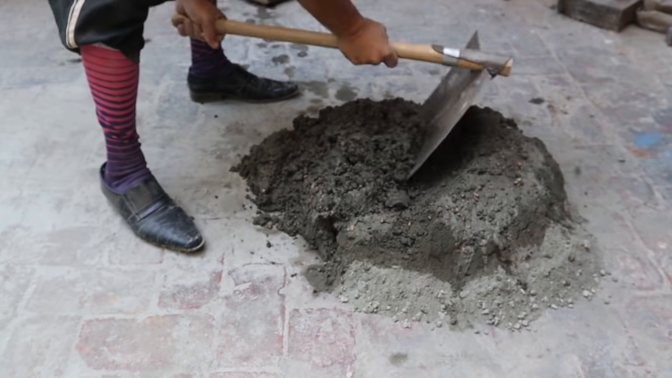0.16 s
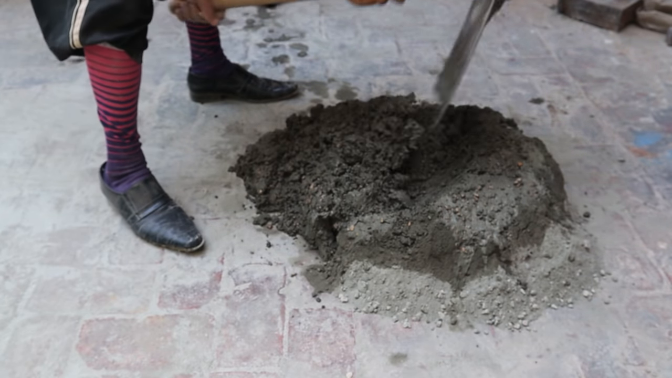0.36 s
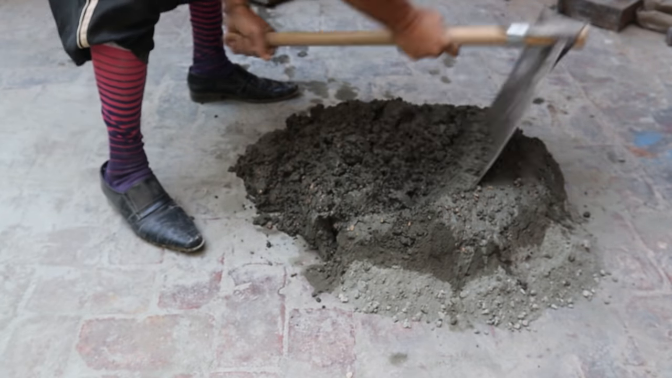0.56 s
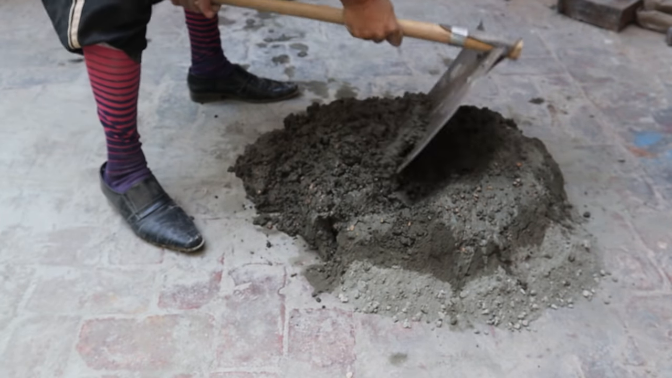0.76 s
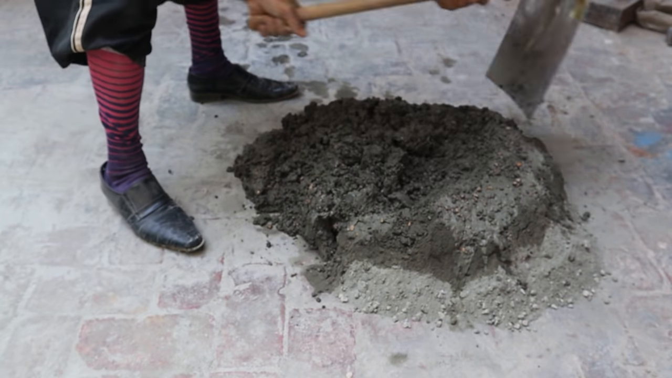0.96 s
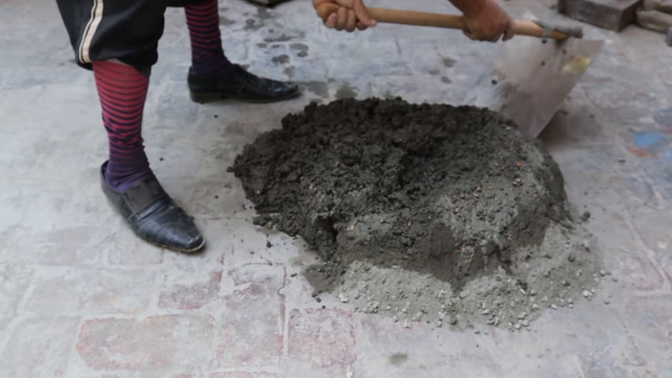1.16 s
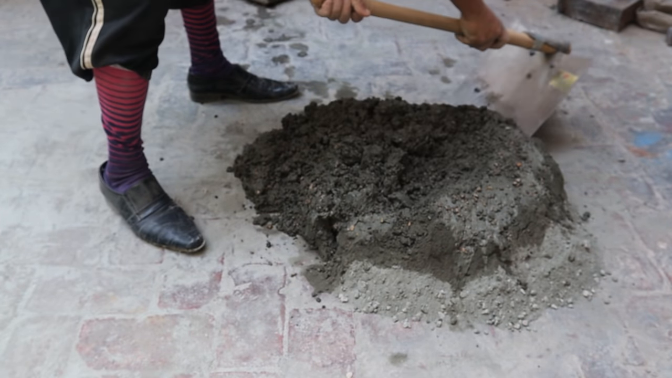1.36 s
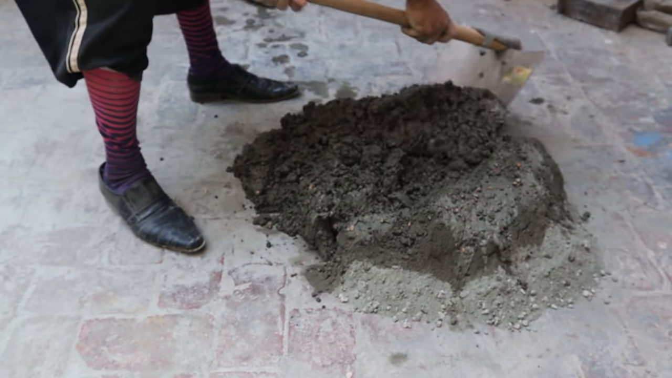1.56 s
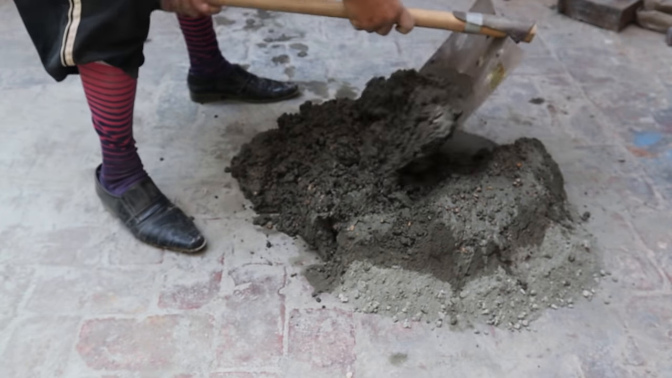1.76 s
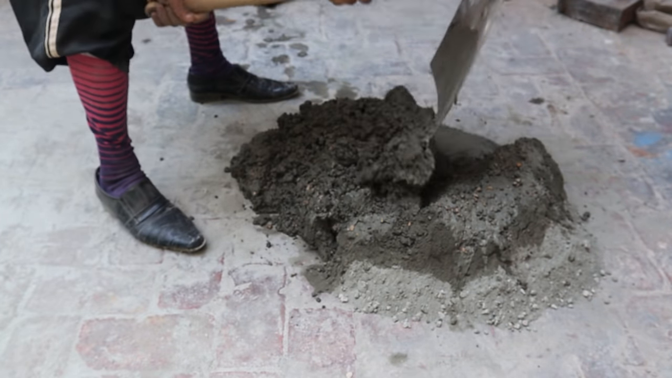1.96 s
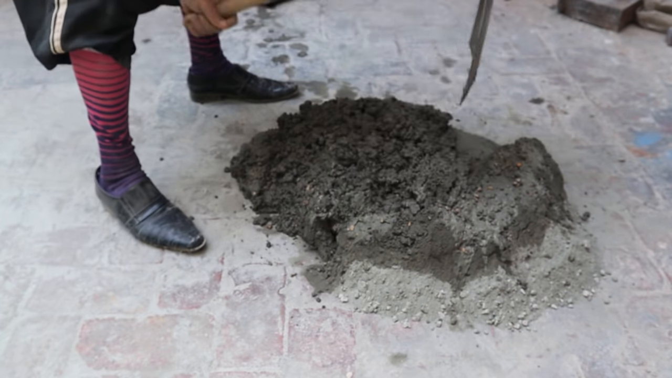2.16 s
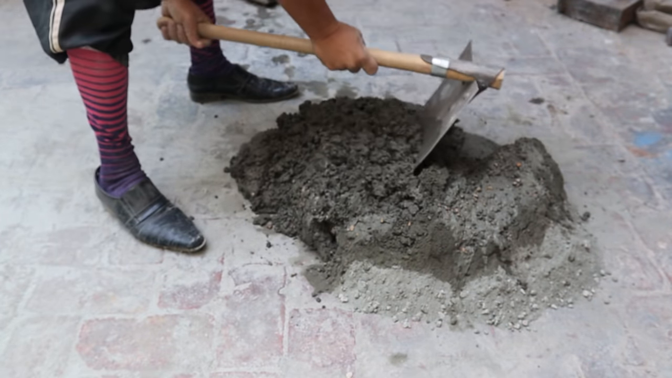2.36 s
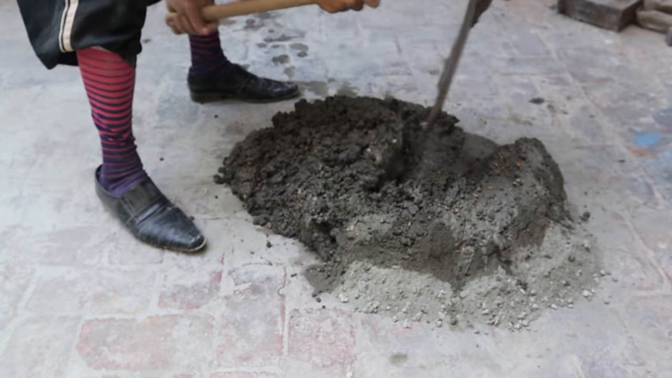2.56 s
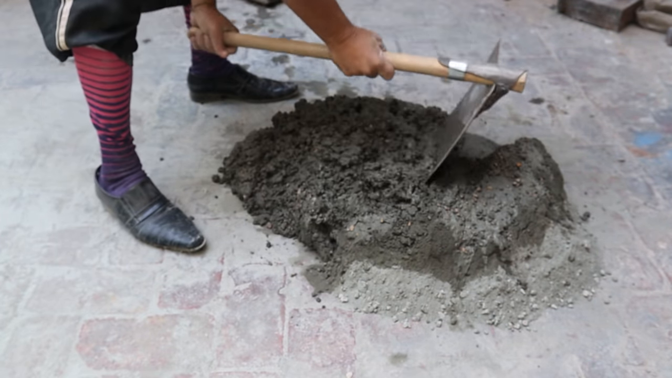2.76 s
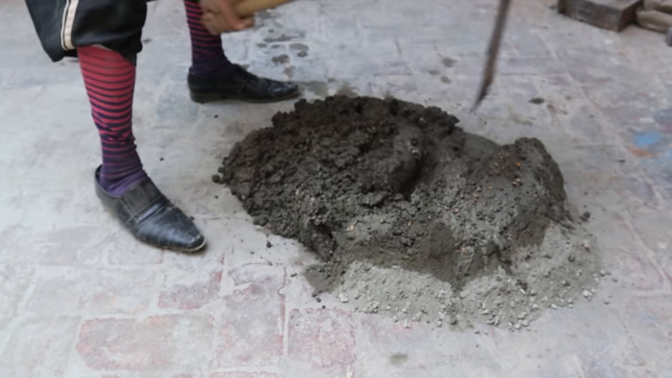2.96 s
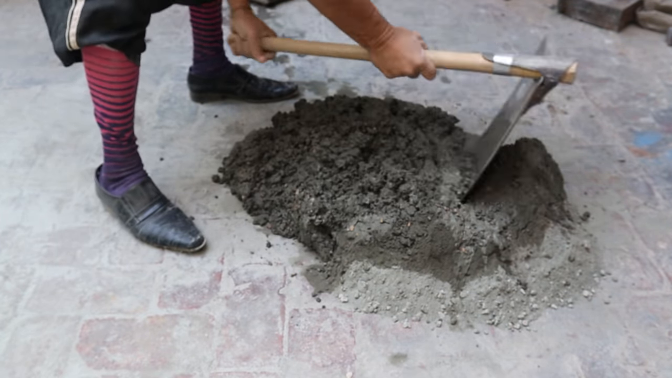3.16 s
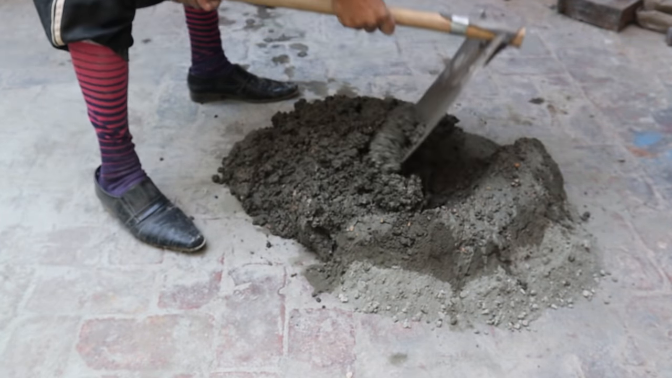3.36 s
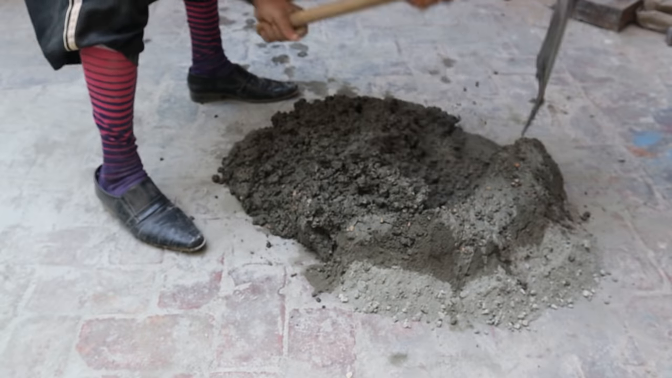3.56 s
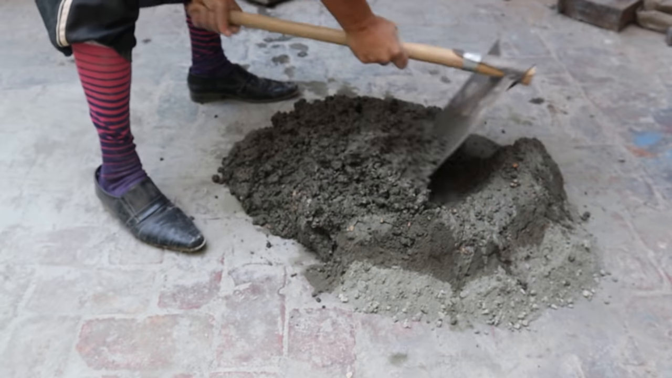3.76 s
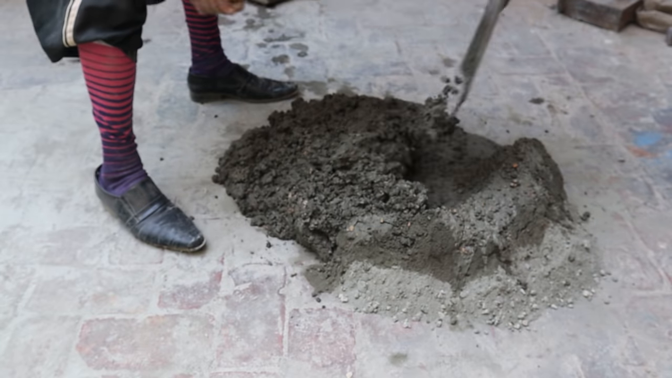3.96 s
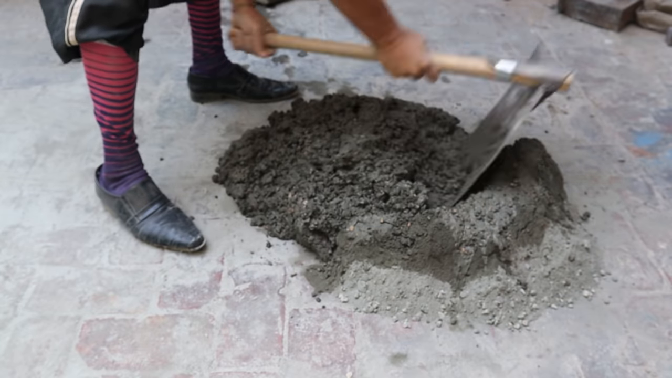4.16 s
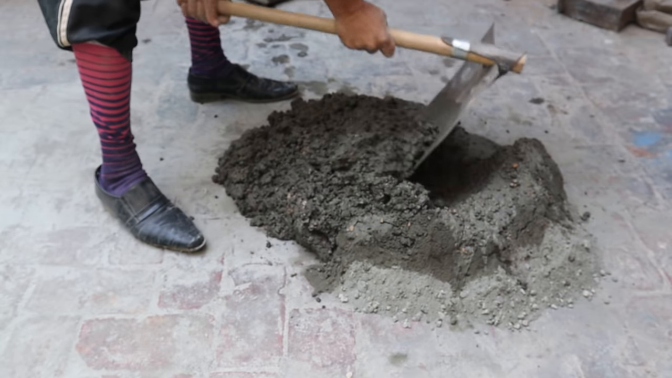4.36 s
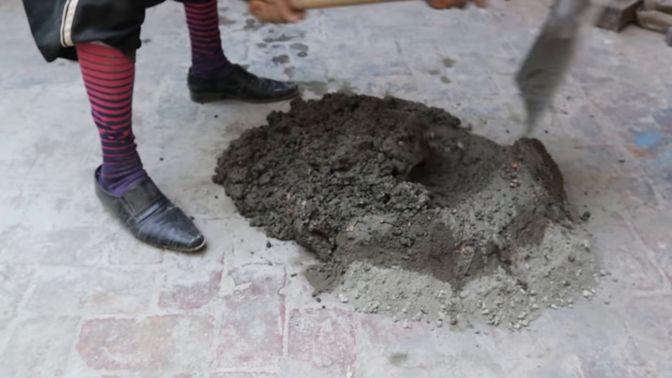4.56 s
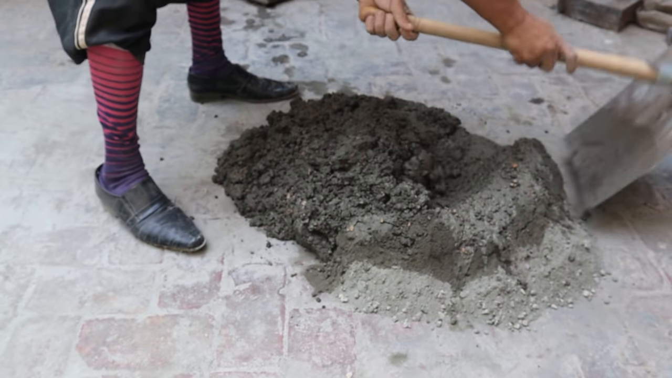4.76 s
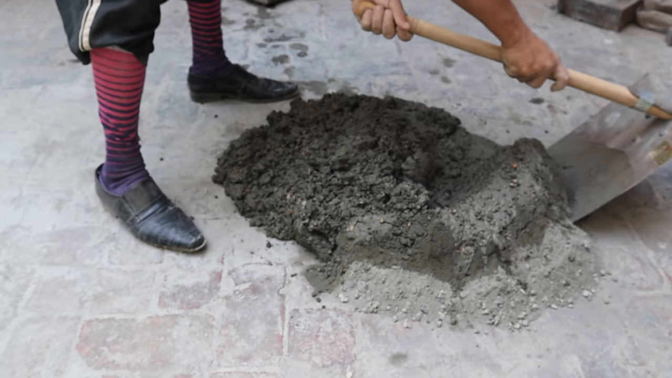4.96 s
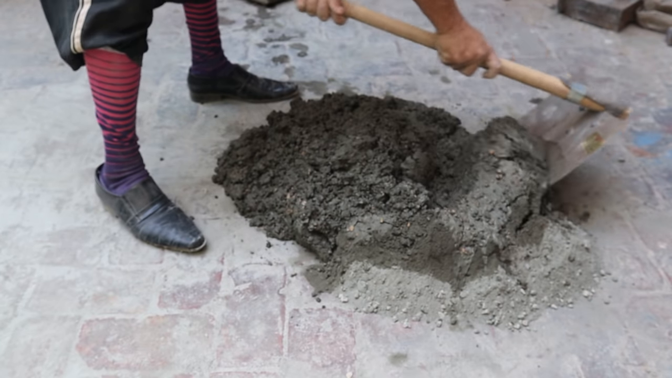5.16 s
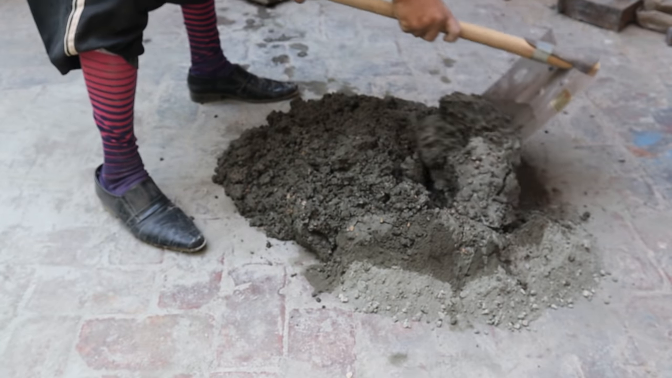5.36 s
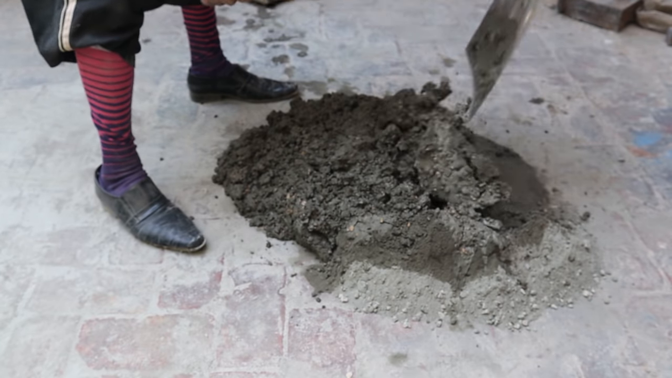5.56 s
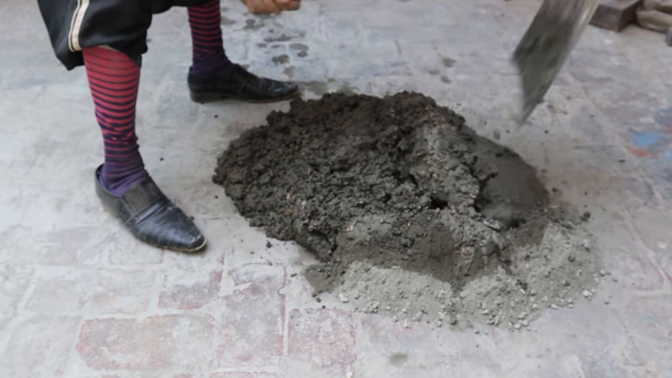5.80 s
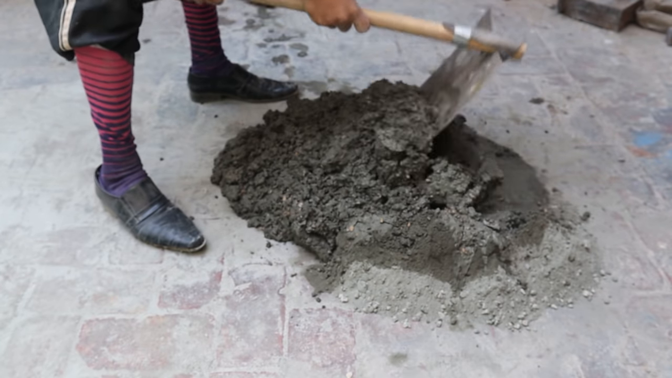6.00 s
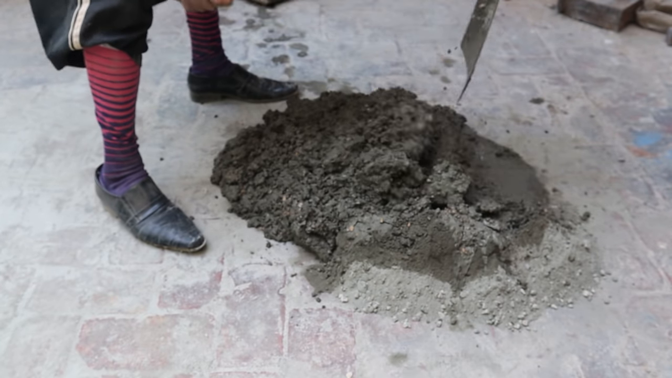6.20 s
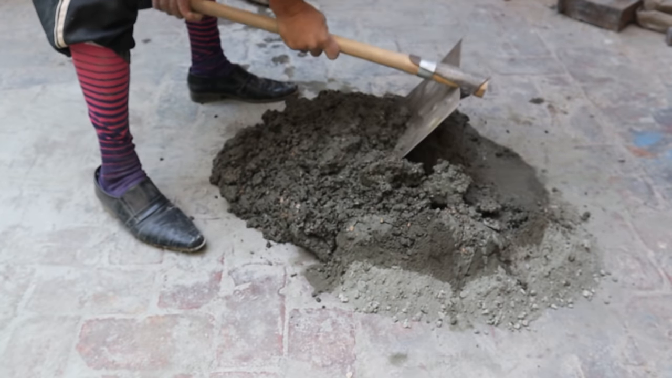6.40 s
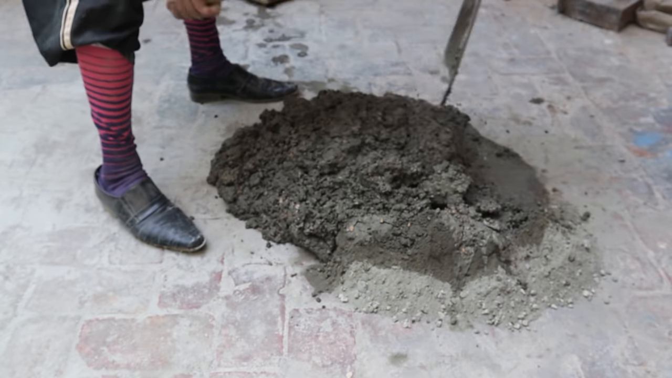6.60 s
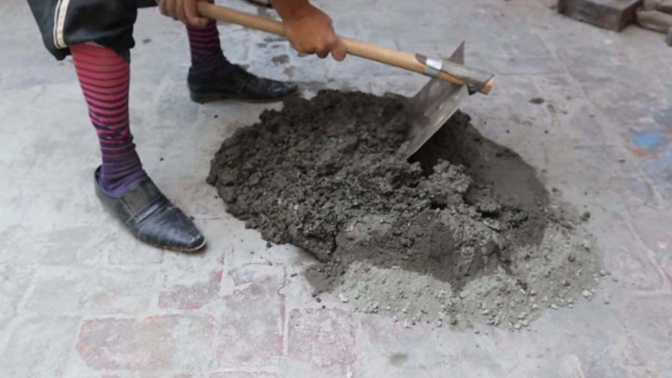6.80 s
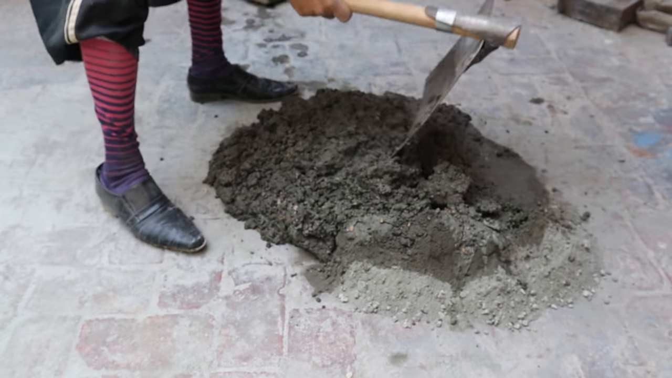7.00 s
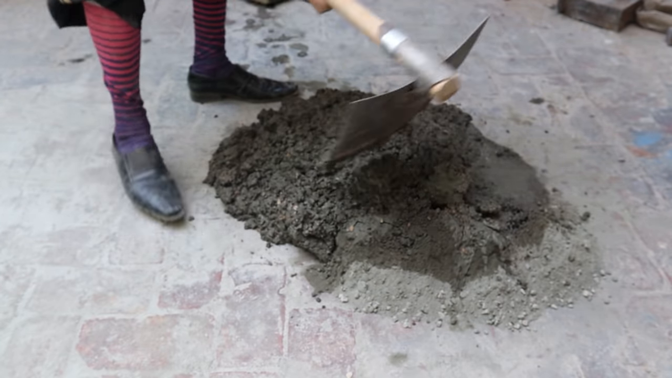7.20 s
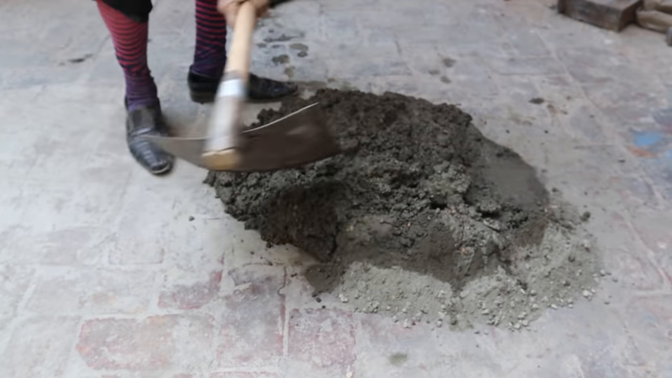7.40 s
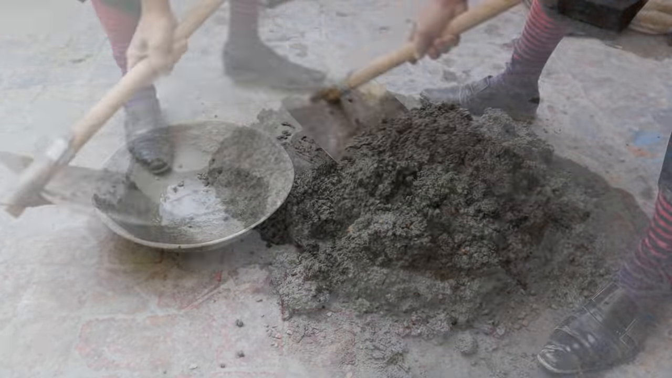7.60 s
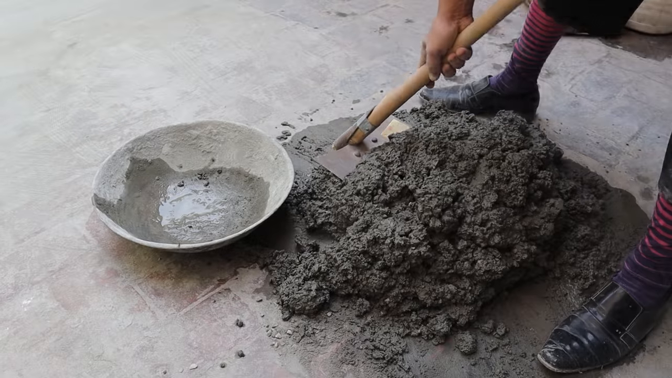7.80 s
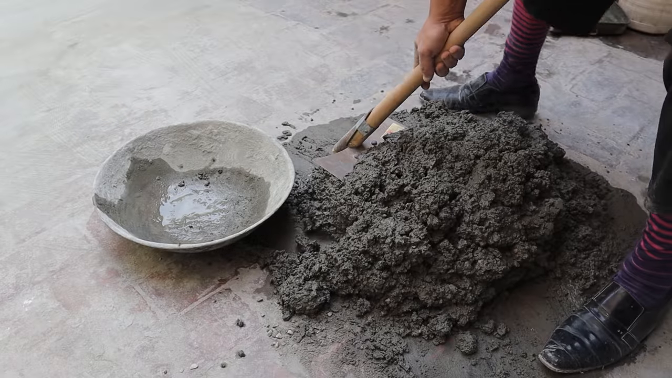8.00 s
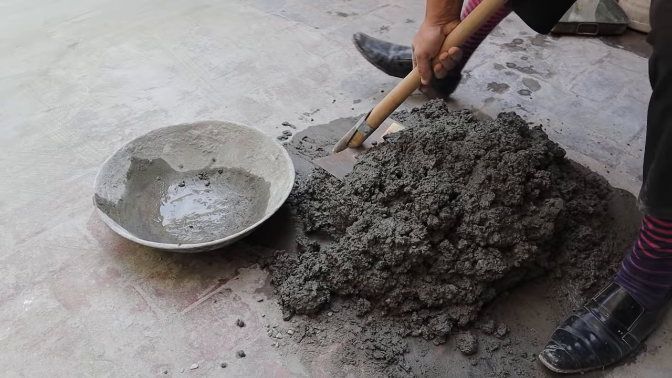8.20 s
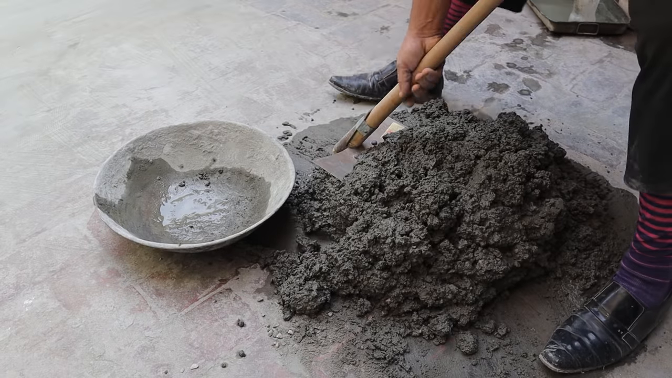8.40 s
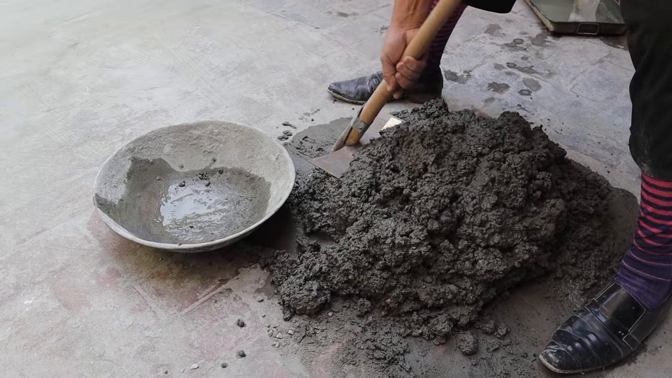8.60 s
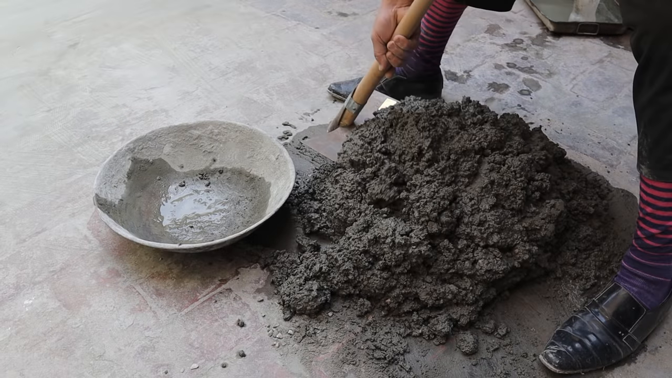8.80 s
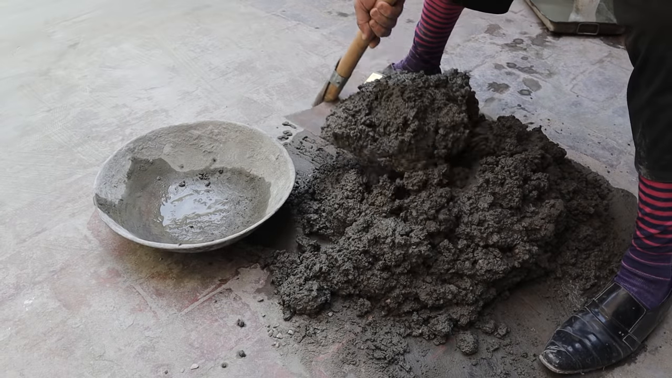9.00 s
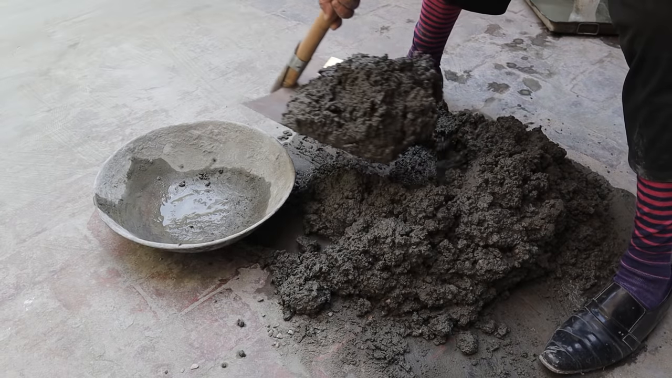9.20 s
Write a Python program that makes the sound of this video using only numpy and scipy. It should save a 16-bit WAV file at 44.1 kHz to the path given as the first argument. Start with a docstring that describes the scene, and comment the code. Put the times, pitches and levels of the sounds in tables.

```python
"""A steel blade chops into a heap of damp sand and cement on a hard yard floor, drags through it and tips it over.
Grit crunches as coloured random grains, and the blade rings dully as a set of steel modes driven by knocks.
Crumbs and dull knocks are short noise bursts; far traffic hums as ringing noise and hoots as wavering tones.
The left microphone port is open, the right one is muffled."""
import sys
import numpy as np
from scipy import signal
from scipy.fft import rfft, irfft, next_fast_len
from scipy.io import wavfile
from scipy.ndimage import uniform_filter1d

SR = 44100
rng = np.random.default_rng(int(sys.argv[2]) if len(sys.argv) > 2 else 0)


def wav_record(signal):
    """Record a signal, one row per channel, as 16-bit PCM in the file named by sys.argv[1]."""
    frames = np.transpose(np.atleast_2d(signal))
    bounded = np.clip(frames, -1, 1)
    # unit amplitude maps onto the largest positive 16-bit level
    quanta = np.round(bounded * 32767).astype(np.int16)
    wavfile.write(sys.argv[1], SR, quanta)


def natural_amplitude(level_db):
    """Convert a level in decibels to a linear amplitude factor, elementwise."""
    exponent = np.asarray(level_db, float) / 20
    return 10 ** exponent


N = 407925

# The tone colour of sand grinding on steel. Each row: pitch in Hz, relative level in dB.
GRIT_COLOUR = [(1200, -17), (2200, 0.5), (4000, 1), (6200, -1), (7200, 2), (10500, -1.5), (13000, -8),
               (15600, -12.5), (16400, -46)]


def evened(x):
    """Scales a signal to an average strength (rms) of 1."""
    return x / np.sqrt(np.mean(x ** 2) + 1e-20)


def add(mix, start_s, sound):
    """Mixes a sound in at the given time, cutting off what runs past the end."""
    part = mix[round(start_s * SR):][:len(sound)]
    part += sound[:len(part)]


def read(points, hz):
    """Reads a table of levels by pitch, on a log-frequency axis."""
    f, value = np.transpose(points)
    return np.interp(np.log(hz + 1), np.log(f + 1), value)


def colour(x, points):
    """Causal filter with the given spectrum; its phase is the Hilbert transform of the log gain."""
    level_db = read(points, abs(np.fft.fftfreq(4096, 1 / SR)))
    log_gain = np.log(natural_amplitude(np.maximum(level_db, -100)))
    taps = np.fft.ifft(np.exp(np.conj(signal.hilbert(log_gain)))).real[:2048]
    return signal.oaconvolve(x, taps / np.linalg.norm(taps))[:len(x)]


def band(x, lo_hz, hi_hz):
    """Keeps mainly the pitches between two limits."""
    sos = signal.butter(2, [lo_hz, min(hi_hz, .45 * SR)], "band", fs=SR, output="sos")
    return signal.sosfilt(sos, x)


def ring(x, modes, damping):
    """Makes a set of modes ring; more damping widens each mode, so it dies sooner."""
    t = np.arange(SR // 2) / SR
    taps = np.zeros(len(t))
    for k, (hz, width, db) in enumerate(modes):
        decay = np.exp(-np.pi * width * damping * t)
        sign = (-1) ** k  # neighbouring modes start in opposite directions
        taps += sign * natural_amplitude(db) * width * decay * np.sin(2 * np.pi * hz * t)
    return signal.oaconvolve(x, taps / np.linalg.norm(taps))[:len(x)]


def distance():
    """Outdoor air is coloured noise, traffic hum is noise through low modes, hoots are thin wavering tones."""
    # The tone colour of the air. Each row: pitch in Hz, relative level in dB.
    air_colour = [(18, -45.5), (30, -16), (53, -24), (131, 0.5), (913, 6), (1160, 5.5), (6900, -4),
                  (13300, -17.5), (16000, -14.5)]
    # How the air swells and stills. Each row: time in seconds, change of level in dB.
    air_swell = [(0, 0.5), (.55, -4), (1.1, -4), (2.5, -0.5), (4.5, 2), (5.8, -5), (7.3, -8), (8.2, -2.5),
                 (9.25, -1.5)]
    # The modes of the low hum. Each row: pitch in Hz, width in Hz before damping, relative level in dB.
    hum_modes = [(143, 9.4, 1), (185, 13, -13.5), (232, 14, 2.5), (300, 98, -1.5), (312.5, 120, 3),
                 (530, 160, -5.5)]
    # How the traffic hum comes and goes. Each row: time in seconds, relative level in dB.
    hum_swell = [(0, -68), (3.2, -73), (3.68, -56), (4.2, -63), (5.6, -71.5), (7.3, -68), (7.9, -52),
                 (8.4, -56), (8.53, -51.5), (8.95, -63.5), (9.03, -53.5), (9.25, -56.5)]
    # The far hoots. Each row: start in seconds, end in seconds, pitch in Hz, relative level in dB.
    hoot_rows = [(.3, 0.67, 1190, -62.5), (1.05, 1.242, 1660, -68.5), (1.1, 1.24, 774, -69),
                 (2.02, 2.36, 1196, -61), (2.6, 3.114, 1187, -63), (7.9, 8.31, 1700, -66),
                 (8.65, 9.202, 1580, -66)]

    t = np.arange(N) / SR
    air = natural_amplitude(-58.5) * colour(rng.standard_normal(N), air_colour)
    air *= natural_amplitude(np.interp(t, *np.transpose(air_swell)))
    hum = evened(ring(rng.standard_normal(N), hum_modes, damping=0.74))
    out = air + hum * natural_amplitude(np.interp(t, *np.transpose(hum_swell)))
    waver = 1 + .15 * evened(uniform_filter1d(rng.standard_normal(N), 1500))  # slow, small level changes
    for start, end, hz, db in hoot_rows:
        span = t[:round((end - start) * SR)]
        tone = np.sin(2 * np.pi * hz * span) * signal.windows.tukey(len(span), .4)
        add(out, start, natural_amplitude(db) * tone * waver[round(start * SR):][:len(span)])
    return out


def ticks(rows, t60, low, high):
    """Each row becomes a noise burst between low and high times its centre, falling 60 dB in t60 seconds."""
    out, t = np.zeros(N), np.arange(SR // 8) / SR
    for s, db, hz in rows:
        burst = evened(band(rng.standard_normal(len(t)), low * hz, high * hz))
        rise = np.minimum(t / 0.00057, 1)
        add(out, s, burst * natural_amplitude(db - 60 * t / t60) * rise)
    return out


def crumbs():
    """Crumbs tick crisply, dull knocks sound lower, and faint crumbs patter at random while the heap is turned."""
    # Single crumbs and pebbles. Each row: start in seconds, relative level in dB, centre pitch in Hz.
    crumb_rows = [(0.0253, -42, 2480), (0.5332, -48, 1720), (0.9901, -45, 4730), (1.0172, -38.5, 2820),
                  (2.2292, -44, 3930), (3.1842, -46, 7160), (3.6586, -45, 5160), (3.6845, -59, 6900),
                  (4.123, -36.5, 1790), (4.1776, -41.5, 5290), (4.7239, -37, 3160), (5.639, -36.5, 7860),
                  (5.8411, -48, 8350), (8.2267, -59.5, 2280), (8.262, -48.5, 1480), (8.303, -40, 890),
                  (8.5428, -53, 2340), (8.834, -43, 4000), (9.0, -45, 2220), (9.19, -46.5, 3785),
                  (7.967, -37.5, 930), (5.605, -46, 6000), (5.241, -21, 1060), (.484, -48, 5870),
                  (.568, -51, 8000)]
    # Dull knocks: clods that drop or break, and at 1.22 to 1.29 s the blade's low ring on the floor.
    # Each row: start in seconds, relative level in dB, centre pitch in Hz.
    knock_rows = [(0.838, -40, 1380), (1.443, -20, 650), (1.224, -22, 280), (1.285, -25, 290),
                  (5.216, -35, 178), (5.241, -29, 234), (7.521, -22.5, 700), (7.554, -21.5, 890),
                  (7.593, -25.5, 1250), (7.608, -22.5, 396), (7.624, -23, 347), (7.9, -39, 283),
                  (7.535, -26.5, 735), (8.505, -39, 250), (8.534, -40, 249), (8.617, -34, 1300),
                  (8.627, -34.5, 940)]

    t, patter = np.arange(400) / SR, np.zeros(N)
    turning = np.arange(N) < 7.35 * SR
    for hz in (2500, 4500, 8000):  # three sizes of crumb
        hits = rng.random(N) < 14 / SR  # about 14 a second
        drops = hits * rng.standard_normal(N) * turning
        tick = evened(band(rng.standard_normal(len(t)), .75 * hz, 1.4 * hz)) * natural_amplitude(-60 * t / .006)
        patter += signal.oaconvolve(drops, tick)[:N]
    crisp = ticks(crumb_rows, t60=0.029, low=0.23, high=1.76)
    knocks = ticks(knock_rows, t60=0.06, low=0.87, high=1.15)
    return natural_amplitude(-49) * patter + crisp + knocks


def fade(u, level_db, fast, after_db, slow):
    """Power after a motion ends: a quick drop plus a fainter, slower tail (slopes in dB per second)."""
    return natural_amplitude(level_db + fast * u) ** 2 + natural_amplitude(level_db + after_db + slow * u) ** 2


def pressure(layer):
    """Strength over time of the grit (layer 0) or the rumble (layer 1): bites, slides and drags add in power."""
    # The blade bites into the heap. Each row: start in seconds, time to full force in seconds,
    # sinking time in seconds, relative grit level in dB, relative rumble level in dB.
    bite_rows = [(0.2, .002, 0.043, -18.5, -29), (0.645, 0.0057, 0.012, -17, -25),
                 (1.221, 0.00085, 0.0058, -25, -22.5), (2.335, 0.027, 0.035, -19, -29.5),
                 (2.753, 0.046, 0.013, -22.5, -33.5), (3.222, 0.0033, 0.014, -15.5, -28.5),
                 (3.712, 0.0052, 0.035, -18.5, -31), (4.242, 0.0014, 0.007, -19, -27.5),
                 (4.877, 0.0022, 0.0019, -17.5, -19.5), (5.924, 0.013, 0.041, -20, -31.5),
                 (6.371, 0.017, 0.05, -19, -32), (6.798, 0.023, 0.046, -20, -34),
                 (7.404, 0.0015, 0.0041, -33, -35)]
    # The blade slides through the mix, or mix slides off it. Each row: start in seconds, length in seconds,
    # relative grit level and rumble level at the end in dB, swell of the grit up to that end in dB.
    slide_rows = [(.3, 0.061, -34, -42.5, 15), (0.693, 0.06, -30.5, -38.5, 8),
                  (.81, 0.029, -38.5, -46.5, 17), (.87, 0.043, -46, -55, 10), (1.15, 0.045, -51, -79.5, 20),
                  (2.452, 0.072, -35, -45, 9), (2.893, 0.043, -36, -47.5, 14.5),
                  (3.272, 0.16, -44, -47, -11), (3.764, 0.083, -24.5, -30, 3.5),
                  (3.922, 0.041, -36, -41.5, 4.5), (4.224, 0.021, -28, -63.5, 22),
                  (4.283, 0.07, -29.5, -35.5, 3), (4.42, 0.077, -42.5, -51.5, 9.5),
                  (4.73, 0.078, -56.5, -88, -6), (6.042, 0.086, -28.5, -38.5, 12),
                  (6.322, 0.054, -53, -59, 2.5), (6.47, 0.082, -30.5, -43, 9.5),
                  (6.93, 0.087, -35.5, -43, 6.5), (7.02, 0.08, -42, -51.5, 0),
                  (7.18, 0.026, -50.5, -52.5, 8)]
    # Long drags along the floor, one curve each. Each row of a curve: time in seconds,
    # relative grit level in dB, relative rumble level in dB.
    drag_curves = [
        [(1.26, -84, -55), (1.284, -36, -32.5), (1.309, -48, -44.5), (1.41, -41, -34.5), (1.444, -34, -27.5),
         (1.529, -32, -30), (1.599, -49, -45), (1.72, -48, -49.5), (1.808, -42.5, -45.5), (1.91, -43.5, -52.5),
         (1.993, -35, -46.5), (2.09, -56.5, -57.5), (2.167, -53, -52.5), (2.317, -78.5, -82)],
        [(4.9, -51, -46.5), (4.97, -57, -37), (5.048, -62, -52), (5.08, -43, -35.5), (5.102, -46, -39.5),
         (5.13, -37.5, -34.5), (5.245, -39.5, -37), (5.31, -52, -44), (5.4, -52.5, -51.5), (5.516, -49, -49.5),
         (5.6, -36, -46.5), (5.64, -56, -55), (5.75, -63.5, -65.5)],
        [(7.43, -52, -56), (7.499, -45, -34), (7.545, -35.5, -32.5), (7.579, -36.5, -36.5), (7.6, -33.5, -31),
         (7.644, -34, -35), (7.79, -37, -35.5), (7.844, -63, -42), (8.0, -63, -49.5), (8.3, -83.5, -64.5),
         (8.355, -56.5, -52.5), (8.465, -55, -73), (8.529, -61, -48.5), (8.594, -86, -55), (8.624, -60.5, -34),
         (8.689, -55.5, -55.5), (8.884, -55, -61), (9.14, -68, -62), (9.22, -55.5, -70)],
    ]
    # Pairs are (grit, rumble); slopes are in dB per second.
    sink_slope = (-200, -51.5)[layer]  # while the blade sinks
    stop_slope = (-700, -400)[layer]  # once it has stopped
    settle_db, settle_slope = (-9, -0.5)[layer], (-250, -170)[layer]  # the heap settles after a bite
    swell_share = (1, .45)[layer]  # the rumble follows only part of a slide's swell
    start_slope, end_slope = (502, 298)[layer], (-420, -220)[layer]  # around a slide
    trickle_db, trickle_slope = (-19.5, -15.5)[layer], (-110, -70.5)[layer]  # sand runs on after a slide

    t, power = np.arange(N) / SR, np.full(N, 1e-12)
    u = t[:SR * 3 // 5]
    for s, rise, sink, *db in bite_rows:
        # from -12.5 dB at first contact up to full force, then down as the blade sinks
        top = db[layer] + np.interp(u, [0, rise, rise + sink], [-12.5, 0, sink_slope * sink])
        shape = fade(np.maximum(u - rise - sink, 0), top, stop_slope, settle_db, settle_slope)
        edge = .0015 + .2 * rise  # seconds; a slow bite starts gently
        add(power, s - edge / 2, shape * np.minimum(u / edge, 1) ** 4)
    lead = .1  # seconds of rising sound ahead of a slide
    for s, length, *db, swell_db in slide_rows:
        v = u - lead
        swell = swell_db * swell_share * np.clip(1 - v / length, 0, 1)
        top = db[layer] - swell + start_slope * np.minimum(v, 0)
        after = np.maximum(v - length, 0)
        add(power, s - lead, fade(after, top, end_slope, trickle_db, trickle_slope))
    for drag in drag_curves:
        s, *db = np.transpose(drag)
        moving = (t > s[0]) * (t < s[-1] + .05)
        power += natural_amplitude(np.interp(t, s, db[layer])) ** 2 * moving
    return np.sqrt(power)


def grains(per_s, spread_db):
    """Random slips of sand on steel, a few much larger than the rest."""
    chance, size, sign = rng.random(N), rng.exponential(1, N), rng.standard_normal(N)
    slips = np.clip((per_s / SR - chance) * 50, 0, 1)
    return evened(sign * natural_amplitude(spread_db * np.minimum(size, 5)) * slips)


def mottle(x, patchy_db):
    """Every lump of grit has its own colour: random patches of level over time and pitch."""
    z = signal.stft(x, nperseg=512, noverlap=384)[2]
    patches = uniform_filter1d(rng.standard_normal(z.shape[::-1]), size=8, axis=0)  # over time
    patches = evened(uniform_filter1d(patches, size=3, axis=1))  # over pitch
    z = z * evened(natural_amplitude(patchy_db * patches.T))
    return signal.istft(z, nperseg=512, noverlap=384)[1][:N]


def blade(x, damping):
    """The steel modes ring, damped by the sand that clings; the small blade radiates little deep sound."""
    # The fixed shape of the steel. Each row: pitch in Hz, width in Hz before damping, relative level in dB.
    steel_modes = [(295, 50, -20), (435, 50, -4), (490, 50, -3), (610, 70, -12), (682, 60, 0),
                   (1115, 70, -10), (1400, 60, -14), (1865, 50, -11), (2930, 60, -15)]
    return band(ring(x, steel_modes, damping), 400, 8000)


def strokes():
    """Grains of sand make the crunch; slower grains rumble in the packed mix or ring the bare blade."""
    # The tone colour of the dull rumble. Each row: pitch in Hz, relative level in dB.
    rumble_colour = [(59, -47), (100, -19.5), (377, -11), (490, -12.5), (721, 4), (1360, 2.5), (2000, -1.5),
                     (4000, -10.5), (5200, -12.5), (8800, -120)]

    crunch, rumble = pressure(layer=0), pressure(layer=1)
    # little grit for much rumble: bare steel on the hard floor, free to ring (0 to 1)
    excess_db = 20 * np.log10(rumble / crunch)
    bare = 1 / (1 + np.exp(-(excess_db - 2) / 2.5))
    # sand gives way in lumps
    clumps = evened(natural_amplitude(1.2 * evened(uniform_filter1d(rng.standard_normal(N), 300))))
    slow = mottle(grains(per_s=5920, spread_db=1.0), patchy_db=1.5) * rumble * clumps
    packed = colour(slow * np.sqrt(1 - .85 * bare), rumble_colour)
    rung = blade(slow * np.sqrt(.85 * bare), damping=1.9)
    grit = mottle(grains(per_s=14500, spread_db=1.0), patchy_db=2.0)
    crunching = colour(grit * clumps * crunch, GRIT_COLOUR)
    # small stones knock along the blade
    stones = natural_amplitude(-5) * band(grains(per_s=120, spread_db=3.0) * rumble, 450, 2400)
    return crunching + stones + packed + rung


def chops():
    """Each chop is a burst of shattering grit and a blow into the steel; some add a soft thud in the heap."""
    # The edge lands. Each row: start in seconds, relative level of the crack in dB, of the blade ring in dB.
    chop_rows = [(0.2032, 7.5, -23), (0.6463, 7, -23), (1.2189, -18, 0), (2.3531, 3.5, -25.5),
                 (2.757, -6, -39), (3.2232, 6.5, -27), (3.713, 5.5, -26), (4.2447, 0.5, -30),
                 (4.8773, 2.5, 9), (5.9289, 7, -32), (6.3761, 6, -59), (6.819, -0.5, -32)]
    # The heap slumps after a chop. Each row: start in seconds, relative level in dB.
    thud_rows = [(3.2239, -22.5), (3.713, -21.5)]
    # The bare blade rebounds on the floor. Each row: start in seconds, relative level of the blade ring in dB.
    bounce_rows = [(1.236, -3), (1.287, -22), (1.32, -12.5), (4.926, -2.5), (4.951, -10.5), (4.963, -7.5),
                   (4.995, -18), (5.025, -19)]

    crack, blow, thud = np.zeros((3, N))
    t = np.arange(SR // 5) / SR
    knock = natural_amplitude(-60 * t / .0007)  # one short push
    for s, crack_db, ring_db in chop_rows:
        shatter, rattle = rng.standard_normal((2, len(t)))
        add(crack, s, shatter * natural_amplitude(crack_db - 60 * t / 0.025) * np.minimum(t / .0008, 1))
        chatter = .2 * rattle * natural_amplitude(-60 * t / .03)  # a little chatter follows the push
        add(blow, s, natural_amplitude(ring_db) * (knock + chatter))
    for s, thud_db in thud_rows:
        settle = np.minimum(t / 0.05, 1)  # the heap takes time to settle
        add(thud, s, rng.standard_normal(len(t)) * natural_amplitude(thud_db - 60 * t / 0.19) * settle)
    for s, ring_db in bounce_rows:
        add(blow, s, natural_amplitude(ring_db) * knock)
    shattering = natural_amplitude(-8) * band(colour(crack, GRIT_COLOUR), 8400, 14500)
    rung = natural_amplitude(-8) * blade(blow, damping=.55)
    return shattering + rung + natural_amplitude(15) * band(thud, 150, 380)


def yard(x):
    """Echoes from floor and walls: sparse taps of random sign, falling 60 dB in a quarter of a second."""
    taps, at = np.zeros(SR // 2), np.arange(120, SR // 2 - 20, 20)
    taps[at + rng.integers(0, 20, len(at))] = rng.choice([-1., 1.], len(at))
    taps *= natural_amplitude(-60 * np.arange(len(taps)) / SR / .25)
    return signal.oaconvolve(x, taps / np.linalg.norm(taps))[:N]


def scene():
    """The work with its echoes and the distance reach both ports alike."""
    far = distance()
    near = crumbs() + strokes() + chops()
    return np.tile(near + natural_amplitude(-14) * yard(near) + far, (2, 1))


def top_cut(x):
    """Nothing passes above the cut-off."""
    return signal.sosfilt(signal.butter(12, 16470, fs=SR, output="sos"), x)


def record(dry):
    """Deep bass is cut; the muffled right port passes the bass that is left and dulls the rest; peaks clip."""
    bass_cut = signal.butter(3, 100, "high", fs=SR, output="sos")
    left = natural_amplitude(3.5) * signal.sosfilt(bass_cut, dry[0])
    size = next_fast_len(N + 8192)
    jf = 1j * np.fft.rfftfreq(size, 1 / SR)
    muffle = (1 + jf / 118) / (1 + jf / 105 + (jf / 150) ** 2)  # falls by 6 dB an octave above the bass
    muffle = muffle * (1 + (jf / 7600) ** 2)  # silent at 7600 Hz, rising again above it
    right = irfft(rfft(left, size) * muffle, size)[:N]  # the same sound as on the left, muffled
    mix = np.clip([left, right], -1, 1)
    return top_cut(mix)


dry = scene()
out = record(dry)
wav_record(out)
```